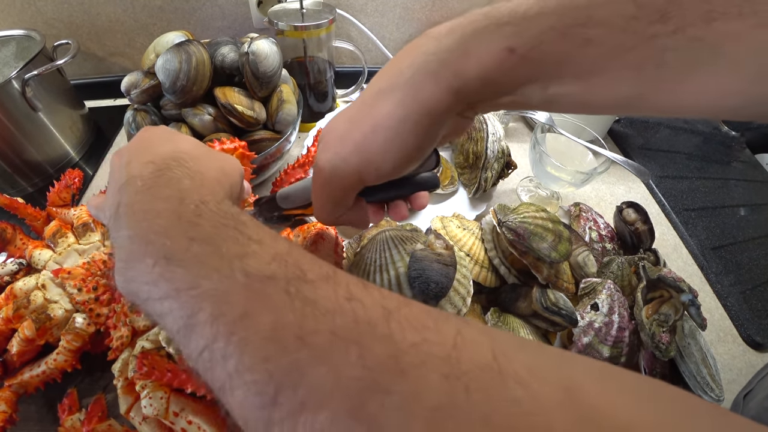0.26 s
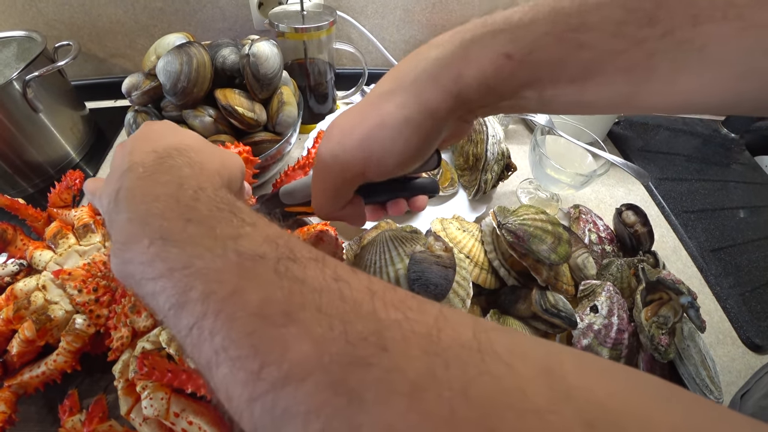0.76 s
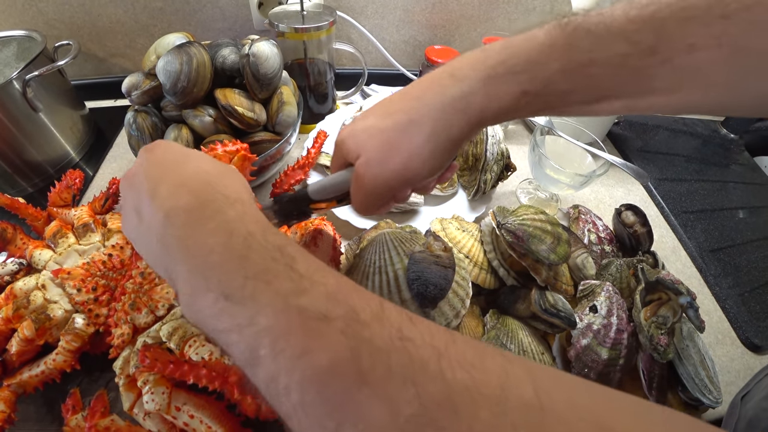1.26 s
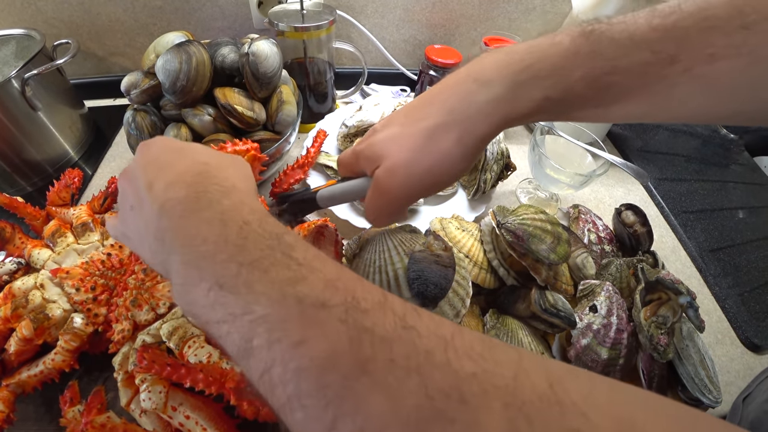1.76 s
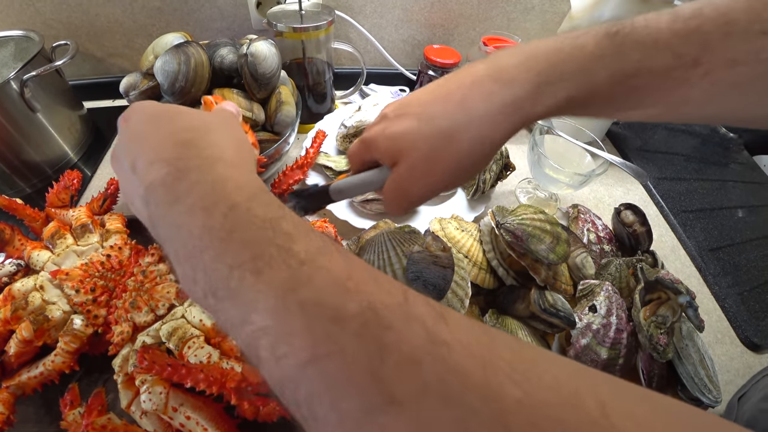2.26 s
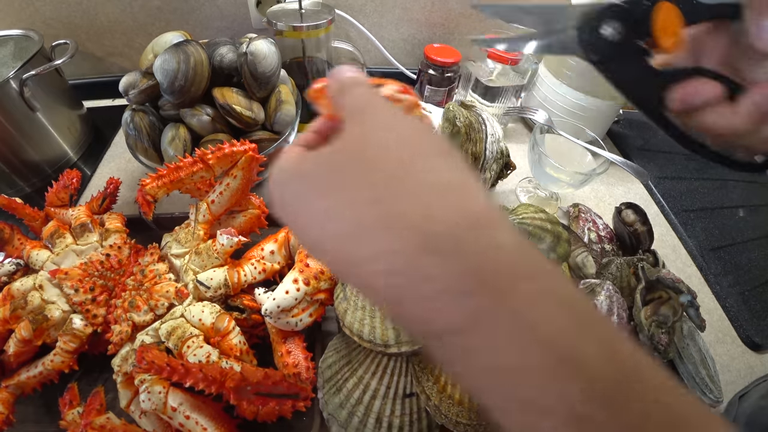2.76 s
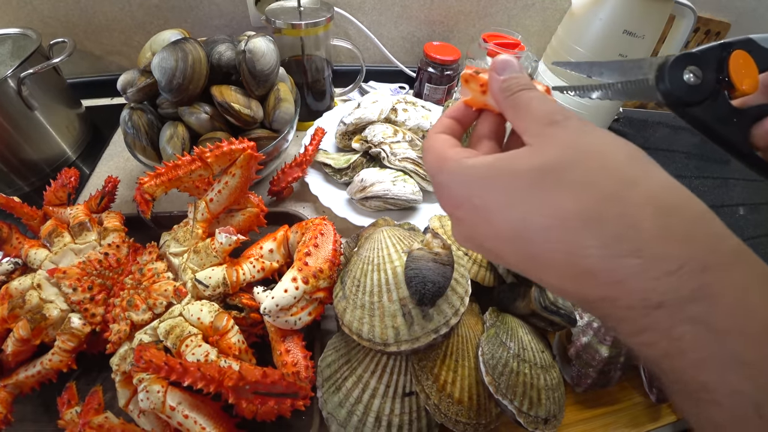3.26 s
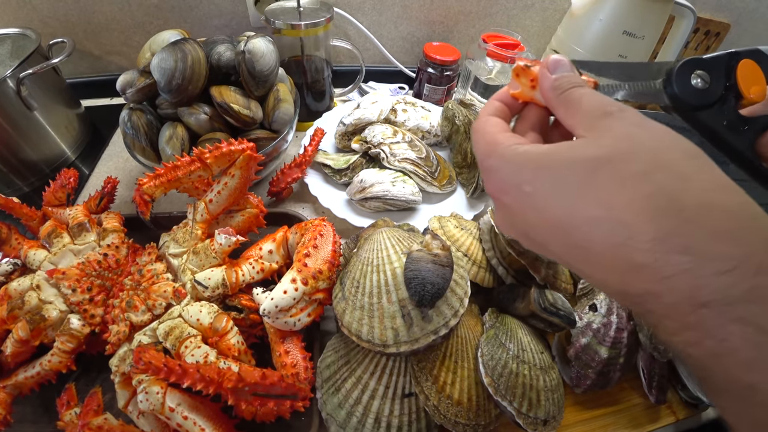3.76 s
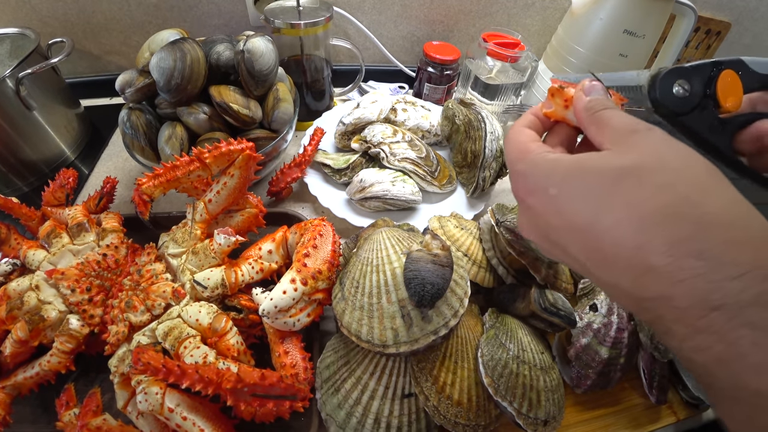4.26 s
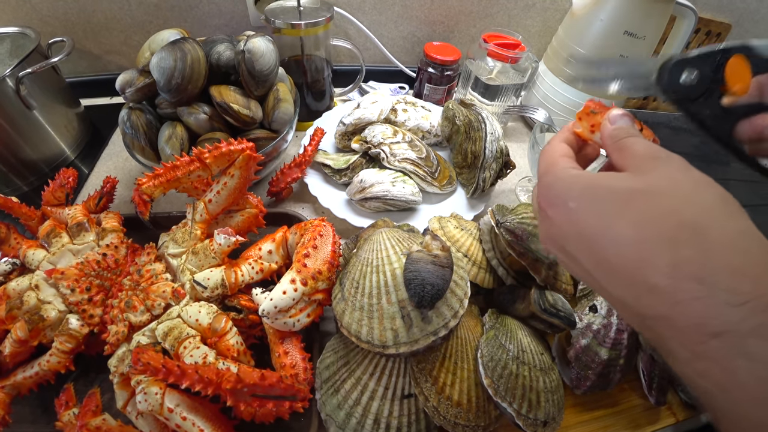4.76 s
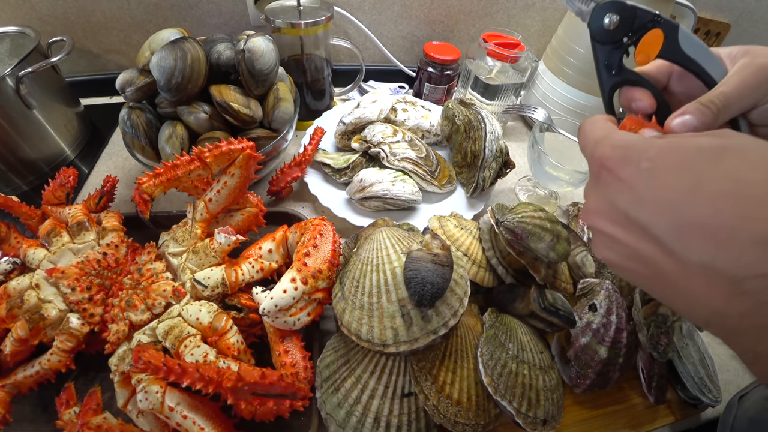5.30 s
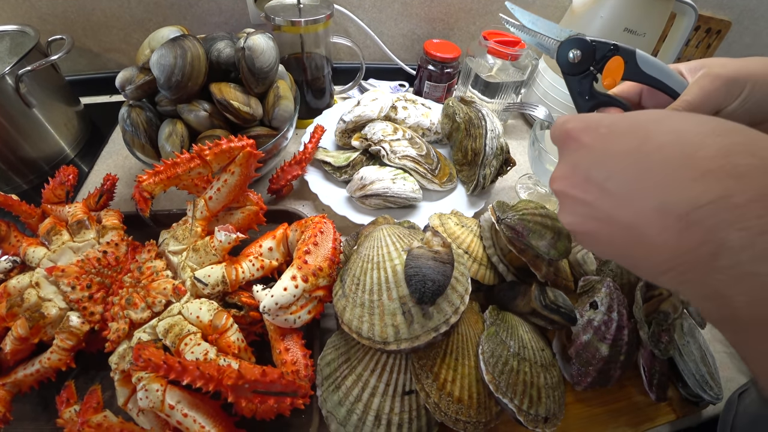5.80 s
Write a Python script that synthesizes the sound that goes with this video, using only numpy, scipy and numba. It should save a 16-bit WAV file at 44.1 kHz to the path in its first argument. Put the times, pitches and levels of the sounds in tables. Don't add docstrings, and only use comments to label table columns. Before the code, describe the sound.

Shears crunch through hard crab shell on a kitchen table, then snip a lifted piece with sharp cracks, over a quiet fridge drone.

```python
import sys
import numpy as np
from scipy import signal
from scipy.fft import rfft, irfft
from scipy.io import wavfile
from numba import njit

SR = 44100
rng = np.random.default_rng(int(sys.argv[2]) if len(sys.argv) > 2 else 0)


def inscribe(sig):
    pcm = np.round(np.clip(np.atleast_2d(sig).T, -1, 1) * 32767)
    wavfile.write(sys.argv[1], SR, pcm.astype(np.int16))


def voltage_ratio(decibels):
    exponent = np.asarray(decibels, float) / 20
    return 10 ** exponent


N = 266099

# start in seconds, level in dB, crispness in dB, burst length in ms.
HANDLING = [(.0818, -30.5, -5, 1.7), (.094, -27, 7.5, 7), (.1154, -27, -3, 17), (.1441, -31.5, 10.5, 1.4),
            (.1588, -20.5, -3, 3.1), (.1756, -46, 10, 5.4), (.2402, -32, -0.5, 10.7),
            (.4084, -29.5, 10.5, 4.9), (.4194, -32.5, 7.5, 13), (.5182, -52, 21, 6.7),
            (.6426, -27.5, -32, 3.7), (1.2395, -33, 2, 7.1), (1.2967, -30, 8.5, 6.7),
            (1.3787, -41.5, 20, 23), (1.4815, -28, 10, 6.9), (1.5639, -28, 4.5, 4.5),
            (1.6283, -33.5, -20, 6.4), (1.7775, -38, 9.5, 10), (5.1751, -47.5, 9, 2.17),
            (5.196, -50, -1, 1.5)]
# start in seconds, level in dB, depth of the break in dB,
# burst length in ms.
CRUNCH = [(.8348, -33.5, -10.5, 7.8), (.8394, -19.5, 4, 3.3), (.8463, -15.5, -5, 5),
          (.8557, -13.5, 1.5, 3.2), (.8763, -18, 0.5, 1.5), (.8862, -17, -2, 3.6), (.9076, -10, -11, 4),
          (.9333, -26.5, -8, 14), (.955, -12.5, -7, 6.2), (.981, -22, 3, 2.9), (.9836, -8, 2, 2.91),
          (1.0124, -10, 16, 5.1), (1.0207, -15, 16.5, 16), (1.0504, -19, 15, 17), (1.0741, -14.5, 6.5, 5),
          (1.08, -17, 14.5, 7.9), (1.1215, -25, 15.5, 2.2), (1.129, -19, -1, 11), (1.1409, -21, -6, 4.5),
          (1.1845, -18, 3.5, 3.8), (1.2638, -15, 5, 5.8), (1.3429, -40.5, -3, 4), (1.9694, -27, 5.5, 6.9),
          (1.9821, -26.5, 10.5, 12.3), (2.0196, -28.5, 8, 5.5), (2.0324, -33, 13, 5.1),
          (2.0534, -13.5, 10, 6.8), (2.0854, -15.5, 5.5, 6.8), (2.1077, -16, 8.5, 6.7),
          (2.2867, -38.5, 12.5, 20)]
# start in seconds, level in dB, crispness in dB,
# burst length in ms.
TAPS = [(1.4219, -33, 6.5, 6), (1.4659, -32.5, 0, 3.3), (1.5834, -27, 0.5, 2.6), (1.6964, -45, 0, 2.6),
        (1.7062, -31, -2, 4.7), (1.823, -34, -4, 5.2), (1.8471, -35, -3, 31), (1.906, -27, -0.5, 13),
        (2.297, -33.5, -19, 12.6), (2.8788, -62.5, 23.5, 1.2), (3.0636, -68.5, 27, 3),
        (3.3314, -49, -8, 1.6), (3.3469, -59, 15, 6), (3.5334, -48, 1, 3.8), (3.5902, -44, -3, 7.4),
        (3.6721, -45, -9, 8.5), (5.3087, -75.5, 40, 9.5), (5.362, -52, 1, 3.5), (5.4459, -66.5, 19.5, 2.8),
        (5.5037, -43, 4, 3.6), (5.5464, -50, -1, 3.8), (5.7311, -21, 1, 3.9), (5.8028, -41, 11, 2.5)]
# start in seconds, level in dB, crispness in dB, burst length in ms.
SNIPS = [(3.8567, -23.5, -1.5, 2.3), (3.9195, -26, 6.5, 8.4), (3.9288, -15.5, 2.5, 2),
         (3.9471, -13, 0.5, 2.5), (3.951, -12, 4.5, 3.2), (3.9626, -18.5, 4.5, 5.9),
         (3.9722, -21.5, -2.5, 2.5), (3.9896, -23, 1, 3.3), (4.1315, -14, 2, 2.6), (4.1693, -23.5, -5, 6.1),
         (4.2116, -32.5, 10.5, 2.2), (4.2183, -41, 13, 4), (4.2311, -17.5, 4, 4.9), (4.2423, -21, 8, 3),
         (4.2511, -6.5, -7, 1.9), (4.2605, -17.5, -26, 3), (4.2694, -13, -3, 12), (4.2875, -23.5, 7.5, 1.9),
         (4.306, -27, -18, 10), (4.3255, -43.5, 20.5, 4.7), (4.5015, -18, 7.5, 1.9),
         (4.533, -23.5, 9.5, 1.5), (4.5368, -21, 10.5, 2.1), (4.5432, -15.5, 5, 2.5),
         (4.5532, -29, 5.5, 18), (3.9312, -13, -1, 4), (3.9435, -21, 2.5, 3.4), (3.9556, -9, -4.5, 4.8),
         (3.9752, -18.5, 3.5, 8.9)]
# start in seconds, level in dB, crispness in dB,
# burst length in ms.
SPLITS = [(4.576, -26.5, 12, 1.1), (4.5792, -23, 12, 3.2), (4.7193, -33, 5, 10), (4.7351, -16.5, 1.5, 2.6),
          (4.7583, -25.5, -7, 1.6), (4.7703, -15.5, -5, 2.3), (4.7859, -21.5, -7, 1.7),
          (4.7903, -15, -9.5, 5), (4.8017, -6.5, -19, 2.5), (4.8072, -10.5, -2.5, 5.6),
          (4.8173, -19, -1.5, 2.7)]
# the events,
# four shares in dB, four changes in dB per dB of the events' third column.
KINDS = [
    (HANDLING, (-9.5, -19.5, -15, -1.5), (0.83, 0.91, 0.4, 0)),
    (CRUNCH, (0.5, -10, -1.5, -15.5), (-0.031, 0.26, -.4, 1.04)),
    (TAPS, (-7.5, -1, -11, -10.5), (0.8, 0.061, 1.05, 0.41)),
    (SNIPS, (-2.5, -2.5, -3, -29), (1.09, 0.086, 1.17, 0.74)),
    (SPLITS, (1, 1, -23.5, -4.5), (0.95, 0.18, 2.4, 0.48)),
]


def fractures():
    breaks = []
    for events, shares, slopes in KINDS:
        for s, db, trait, ms in events:
            parts_db = db + np.array(shares) + trait * np.array(slopes)
            breaks.append((s, *parts_db, ms))
    return breaks


# time in seconds, pitch in
# Hz.
FRAGMENTS = [(0.082, 5610.0), (0.094, 5200), (0.145, 3690.0), (0.16, 4640.0), (0.409, 4000),
             (0.643, 3620.0), (0.84, 6040), (0.847, 4000), (0.856, 4000), (0.877, 8350.0),
             (0.887, 4050), (0.908, 5300), (0.935, 8470.0), (0.957, 8100), (0.985, 5060),
             (1.013, 3860), (1.023, 4270), (1.052, 6790.0), (1.074, 7200), (1.081, 4030),
             (1.122, 4010), (1.133, 7140), (1.141, 9740.0), (1.185, 7540), (1.265, 4770),
             (1.298, 4230.0), (1.424, 10210.0), (1.483, 4500), (1.584, 4600), (1.708, 3880),
             (1.788, 4360), (1.971, 4030), (2.054, 8200), (2.086, 5050), (2.11, 5400), (2.287, 5660),
             (3.857, 6740.0), (3.921, 5310.0), (3.929, 5030), (3.947, 5080), (3.951, 4360),
                    (3.963, 5090), (3.991, 6420.0), (4.132, 8100), (4.17, 6690.0), (4.212, 5440.0),
                    (4.219, 10250.0), (4.231, 5700), (4.244, 5900), (4.251, 3820), (4.261, 3900.0),
                    (4.27, 10270), (4.288, 6700), (4.326, 5950), (4.502, 4310), (4.537, 5830),
                    (4.543, 5740), (4.556, 5330.0), (4.58, 6400), (4.72, 5720), (4.735, 5670),
                    (4.759, 5800), (4.771, 5700), (4.787, 6320.0), (4.791, 5600), (4.802, 5840),
                    (4.808, 5680), (4.818, 6360), (5.732, 5700), (5.804, 4180)]


def fragment_hz(s, usual_hz):
    at, hz = min(FRAGMENTS, key=lambda row: abs(row[0] - s))
    return hz if abs(at - s) < .006 else usual_hz


# frequency in Hz, width in Hz, level in dB.
LEG = [(803, 71, -4.5), (1226, 130, -7.5), (1668, 420, -3), (2025, 170, -0.5)]


def cracks(hz, loose):
    drive, t = np.zeros((4, N + 2048)), np.arange(2048) / SR
    for s, *db, ms in fractures():
        spray = rng.standard_normal((4, 2048)) * voltage_ratio(3.2 * rng.standard_normal(2048))
        first_break = .8 * np.exp(-t / .0006)
        tear = .75 * np.exp(-t * 1000 / ms)
        crumbs = .06 * np.exp(-t / .011)
        burst = spray * (first_break + tear + crumbs)
        burst *= 1 - np.exp(-t * 90000 / ms ** 2)
        burst[:, 0] += 3.2 + 10. / ms
        b, a = signal.iirpeak(fragment_hz(s, 3600 * 2.32 ** rng.random()), 4.0, SR)
        burst[0] = .62 * burst[0] + 1.6 * signal.lfilter(b, a, burst[0])
        i = int(s * SR)
        drive[:, i:i + 2048] += voltage_ratio(np.array(db))[:, None] * burst
    snap, ring, splinter, body = drive[:, :N]
    sharp = voltage_ratio(-2.5) * band(snap, 2700, 8200) + voltage_ratio(-1.0) * band(splinter, 5800, 12460)
    leg = voltage_ratio(-0.5) * band(body, 600, 2490, order=3) + voltage_ratio(5.0) * modes(body, LEG)
    return sharp + voltage_ratio(12.0) * shell(ring, hz, loose) + leg


# time in seconds, ring pitch in Hz, left minus right in dB,
# looseness of the grip as a factor on the ring width.
PIECE = [(0, 2242, 0, 1.2), (.8, 2580, 1, 1.8), (1.2, 2710, 0.5, 1.5), (1.35, 2910, 1.5, .45),
         (1.95, 2857, 2.5, 0.7), (2.27, 2860, 0.5, .8), (2.285, 2026, -2, .8), (3.3, 2543, -1, 1.5),
         (3.6, 2670, -2, 0.7), (4.2, 2646, -3.5, 0.78), (4.29, 2960, -2.5, 1.5), (4.4, 2810, -2.5, 1.8),
         (4.56, 2830, -4.5, 1.2), (4.62, 3066, -2, 4), (4.815, 2946, -5.5, 0.97), (4.84, 3150, 2, 2.2),
         (5.1, 3080, -4, 1.9), (5.73, 2707, -4, 2.1), (6.03, 2920, 0, .9)]


def held_piece():
    s, *columns = np.transpose(PIECE)
    hz, pan_db, loose = [np.interp(np.arange(N) / SR, s, column) for column in columns]
    return hz, pan_db, np.clip(loose, .25, 3)


# offset as a share of the ring pitch, width in Hz, level in dB.
SHELL = [
    (-.03, 240, 0),
    (.035, 220, -1),
    (.02, 900, -13),
]


def shell(x, hz, loose):
    wobble, wobble_per_s = 0.021, 90
    t = np.arange(N) / SR
    flutter = np.interp(t * wobble_per_s, np.arange(2000), rng.standard_normal(2000))
    hz = hz * (1 + wobble * loose * flutter)
    parts = [(1 + off * loose, width * loose, db) for off, width, db in SHELL]
    parts.append((5760 / hz, 290 * loose, -13.5))
    ring = 0
    for ratio, width, db in parts:
        once = svf(x, ratio * hz, width)
        ring = ring + voltage_ratio(db) * svf(once, ratio * hz, 2 * width)
    return ring / np.sqrt(loose)


# start in
# seconds, level in dB, pitch in Hz.
CHIPS = [(0.853, -25.5, 4600), (0.868, -27.5, 3970), (0.872, -25, 3760), (0.889, -20.5, 8460.0),
         (0.8974, -27, 7050.0), (0.911, -6.5, 10400), (0.918, -21.5, 10560.0), (0.9242, -24, 7480.0),
         (0.93, -30, 7340.0), (0.9352, -24.5, 8450.0), (0.9399, -26.5, 6100.0), (0.9488, -23, 9210.0),
         (0.9561, -12, 3430), (0.9848, -16.5, 4980.0), (0.9907, -19.5, 4820), (0.9936, -10, 6090),
         (1.0016, -20.5, 2580.0), (1.0071, -18, 8430), (1.0194, -16.5, 1930), (1.0197, -24.5, 2554),
         (1.0345, -14, 3600), (1.0405, -22, 2590.0), (1.0527, -19.5, 6820.0), (1.072, -14.5, 6860.0),
         (1.0932, -32, 2420), (1.1258, -33, 2760), (1.1333, -21, 7000), (1.275, -34, 4550),
         (1.297, -23.5, 2800), (1.4243, -26, 2830), (1.484, -27, 1970), (1.487, -31, 1800),
         (1.5927, -30, 2900), (1.9706, -33, 4100), (1.9789, -24.5, 2230.0), (2.0148, -30, 3910.0),
         (2.0656, -10, 9800), (2.0742, -20, 1800), (2.083, -19, 2230), (2.0987, -19, 5330.0),
         (2.1029, -16.5, 4000), (2.1065, -25, 5340), (2.2885, -26, 5620.0),
         (3.8563, -26, 2970), (3.9696, -18, 2700), (3.9472, -8.5, 5150), (3.9625, -9, 6890.0),
                (4.133, -26, 8220), (4.1383, -29.5, 2600), (4.2184, -15.5, 10340), (4.2272, -22, 2900),
                (4.2297, -29, 2900), (4.2441, -19.5, 5920), (4.247, -23.5, 2880), (4.2588, -26, 2860),
                (4.2655, -33, 2960.0), (4.27, -14, 9950), (4.2765, -28, 3080), (4.2953, -20, 2790),
                (4.359, -28, 2770), (4.507, -28.5, 3080), (4.5123, -31, 3250.0), (4.5392, -22, 5560),
                (4.5713, -19.5, 2730), (4.5897, -16.5, 3630), (4.7359, -6.5, 5730), (4.767, -22.5, 2840),
                (4.777, -26.5, 2730.0), (4.7873, -14, 2910), (4.811, -19, 3270), (4.823, -33, 3050),
         (.080, -32.5, 796), (.095, -29, 1080), (0.115, -33, 900), (.160, -19, 1220), (0.162, -25.5, 1850),
          (0.237, -32.5, 996), (.248, -32, 1040), (.419, -31.5, 1036), (1.0124, -9, 2460),
          (1.083, -21, 1650), (1.752, -46, 1710), (3.168, -52, 1994), (5.194, -46.5, 958),
          (5.245, -49, 3300), (5.446, -42, 4450), (5.7331, -18, 2690), (5.7312, -21.5, 2390),
          (5.7313, -32, 3100), (5.8025, -25, 2720), (4.226, -26, 7000), (3.9293, -15.5, 5150),
          (4.5796, -10, 6470)]


def chips():
    out, t = np.zeros(N + 512), np.arange(512) / SR
    for s, db, hz in CHIPS:
        ping = np.sin(2 * np.pi * hz * t) * np.exp(-t * hz / 6.9)
        ping[1:3] += .7 * np.array([1, -1])
        i = int(s * SR)
        out[i:i + 512] += voltage_ratio(db - 3.5) * ping
    return out[:N]


# start in seconds, level in dB, hold in seconds, body share in dB.
SQUEEZES = [(0.073, -64, 0.054, 23), (0.157, -57, 0.022, 22.5), (0.442, -60.5, 0.1, 8.5),
            (0.594, -65.5, 0.12, 15), (0.87, -31.5, 0.12, -11), (0.994, -22.5, 0.032, -13),
            (1.097, -46.5, 0.1, 10.5), (1.247, -57.5, 0.18, 10.5), (1.47, -58, .13, 10.5),
            (1.753, -61.5, 0.12, 15.5), (2.059, -30.5, 0.028, -6), (2.266, -63, 0.041, 14)]
# start in seconds, level in dB, hold in seconds, body share in dB.
BITES = [
    (3.64, -82.5, 0.45, 28.5),
    (3.95, -36.5, 0.025, -18),
    (4.08, -50, 0.042, -23),
    (4.25, -29, 0.032, -19),
    (4.36, -52, 0.12, 2),
    (4.554, -29, 0.03, -9),
    (4.789, -31, 0.0077, -11.5),
    (5.77, -60, 0.029, 8),
]


def pressure():
    build_db_per_s, fall_db_per_s = 598.5, (390, 212.5, 198)
    settle_db, settle_db_per_s = -17.5, 77.5
    t, power = np.arange(0, N + 64, 64) / SR, 0
    for table, ring_db in ((SQUEEZES, -14), (BITES, -1)):
        for s, db, hold, body_db in table:
            after = np.maximum(t - s - hold, 0)
            fall = np.maximum(-np.outer(fall_db_per_s, after), settle_db - settle_db_per_s * after)
            build = build_db_per_s * np.maximum(s - t, 0)
            shares = np.array([[0], [ring_db], [body_db]])
            power = power + voltage_ratio(db + shares + fall - build) ** 2
    return [np.interp(np.arange(N) / SR, t, np.sqrt(p)) for p in power]


# start in seconds, end in seconds, shell ring in dB, steel in dB.
SLIDES = [
    (1.303, 1.969, -62, -69),
    (3.348, 3.355, -53, -59.5),
    (3.579, 3.598, -53, -63.5),
    (3.67, 3.817, -42.5, -49.5),
    (3.835, 3.884, -44, -50.5),
    (4.402, 4.468, -39, -48),
]
# frequency in Hz, width in Hz, level in dB.
BLADE = [(4140, 650, 9.5), (5050, 550, 3.5), (7050, 880, 11.5), (7500, 9000, -5.5), (10050, 640, 2),
         (11870, 1200, -4), (13700, 900, -3.5)]
# frequency in Hz, width in Hz, level in dB.
RUB_MODES = [(900, 120, 0), (2600, 200, -1), (3250, 150, 0), (4300, 250, -3)]


def grind(hz, loose):
    steel, ring, body = pressure()
    slide_ring = sum(gate(start, end, db) for start, end, db, _ in SLIDES)
    slide_steel = sum(gate(start, end, db) for start, end, _, db in SLIDES)
    crush = steel * level(band(grit(6000, 2.3), 2000, 13000), -3.0)
    scrape = slide_steel * level(modes(grit(11000, 1.4), BLADE), 0)
    hollow = np.hypot(ring, slide_ring) * level(shell(grit(2100, 3.5), hz, loose), -1.2)
    thumb = gate(5.5, 5.72, -61) * level(modes(grit(4000, 2.7), RUB_MODES), 0)
    leg = body * level(band(grit(2000, 3.4), 300, 3800), -8.0)
    return crush + scrape + hollow + thumb + leg


def grit(density, scatter_db):
    size = voltage_ratio(scatter_db * np.minimum(rng.exponential(size=N), 4)) * rng.standard_normal(N)
    breaks = size * (rng.random(N) < density / SR)
    return level(breaks + 0.64 * rng.standard_normal(N), 0)


# start in seconds,
# level in dB, pitch in Hz, ring time in seconds.
KNOCKS = [(0.077, -37, 128, 0.16), (0.119, -41, 252, 0.14), (0.145, -30.5, 650, 0.076),
          (0.154, -21, 147, 0.081), (0.179, -25, 188, 0.059), (0.239, -45, 182, 0.17),
          (0.299, -42, 182, 0.092), (0.644, -46.5, 156, 0.45), (1.011, -41, 700, 0.065),
          (1.049, -25, 169, 0.078), (1.079, -31.5, 136, 0.21), (1.129, -31, 556, 0.047),
          (1.239, -48.5, 537, 0.12), (1.564, -45, 648, 0.28), (1.599, -28, 162, 0.036),
          (1.907, -41, 487, 0.091), (2.052, -13, 223, 0.022), (2.089, -41.5, 183, 0.3),
          (4.573, -45.5, 241, 0.18), (4.7908, -17, 907, 0.011),
          (.2, -38.5, 113, 0.3), (.418, -35, 1010, 0.067), (0.714, -47, 980, 0.11),
         (1.011, -23.5, 155.6, 0.11), (1.375, -49.5, 2120, 0.31), (1.565, -33.5, 1080, 0.06),
         (2.284, -50, 6600, 0.046), (2.293, -47, 1900, 0.054), (0.069, -38.5, 1090, .05),
         (.297, -31.5, 590, 0.013), (2.981, -55, 128, 0.33), (4.7352, -22.5, 1100, 0.012),
         (5.733, -50, 6300, .1), (5.357, -59, 2920, 0.075), (4.801, -29, 230, 0.041)]


def knocks():
    out, t = np.zeros(N + 8192), np.arange(8192) / SR
    for s, db, hz, t60 in KNOCKS:
        fade = (1 - np.exp(-t * hz)) * 1000. ** (-t / t60)
        rattle = band(rng.standard_normal(8192), 0.69 * hz, hz + 250)
        tone = np.sin(2 * np.pi * hz * t)
        i = int(s * SR)
        out[i:i + 8192] += voltage_ratio(db) * fade * (0.78 * tone + 6.7 * rattle)
    return out[:N]


def bounces(bright, near):
    halves = rng.standard_normal((3, 120)) * np.exp(-np.arange(120) / 16)
    corners = np.arange(N // 900 + 2)
    turn = np.interp(np.arange(N) / 900, corners, 2 * np.pi * rng.random(len(corners)))
    facing = bright + voltage_ratio(2.5) * band(near, 7000, 18000)
    early = 0
    for k, b in enumerate(halves):
        reflected = np.convolve(facing, np.r_[-b[::-1], 0, b], "same")
        early = early + np.cos(turn + k * 2 * np.pi / 3) * reflected
    return voltage_ratio(-27) * early * np.array([[1], [-1]])


def room(bright):
    t60_s, damp, sway_samples = 0.47, 0.13, 14.
    lags = np.array([331, 547, 811, 1097, 1429, 1811, 2251, 2749])
    gain = voltage_ratio(-60 * lags / SR / t60_s)
    return voltage_ratio(-17) * walls(bright + 1e-18, lags, gain, damp, sway_samples)


@njit
def walls(x, lags, gain, damp, sway):
    line, soft, out = np.zeros((8, 4096)), np.zeros(8), np.zeros((2, len(x)))
    for i in range(len(x)):
        total = 0.
        for k in range(8):
            back = i + 4096 - lags[k] + sway * np.sin(i * (3 + k) / SR * 2 + k)
            j = int(back)
            early, later = line[k, j & 4095], line[k, (j + 1) & 4095]
            late = early + (back - j) * (later - early)
            soft[k] += (1 - damp) * (gain[k] * late - soft[k])
            total += soft[k]
            out[k % 2, i] += soft[k]
        for k in range(8):
            line[k, i & 4095] = x[i] + soft[k] - total / 4
    return out


# frequency in Hz, level in dB per Hz.
KITCHEN = [(20, 3.5), (60, 2.5), (120, 1), (250, -6), (400, -9.5), (630, -13.5), (1000, -14.5),
           (2000, -18.5), (4000, -22), (7000, -22.5), (9000, -28), (12500, -25), (16500, -26)]
# frequency in Hz, side minus mid in dB.
KITCHEN_SIDE = [(30, -20.5), (110, -13), (200, -3), (380, 4.5), (800, 10), (2000, 8.5), (4400, 2),
                (9000, -4.5)]
# frequency in Hz, width in Hz, level in dB.
FRIDGE = [(128, 4.7, -66.5), (191, 2.8, -67.5), (264.3, 4.4, -62.5), (318, 14, -68)]


def kitchen():
    hz = np.maximum(np.arange(N // 2 + 1) * SR / N, 1)
    air_hz, air_db = np.transpose(KITCHEN)
    side_hz, side_db = np.transpose(KITCHEN_SIDE)
    colour = voltage_ratio(np.interp(np.log(hz), np.log(air_hz), air_db))
    mid, side = (rfft(rng.standard_normal(N)) * colour for _ in range(2))
    side = side * voltage_ratio(np.interp(np.log(hz), np.log(side_hz), side_db))
    air = np.array([irfft(mid + side, N), irfft(mid - side, N)])
    air = air * voltage_ratio(-61.5 + 4.5) / np.std(air.mean(axis=0))
    drone = sum(level(modes(rng.standard_normal(N), [(f, width, 0)]), db) for f, width, db in FRIDGE)
    return air + drone


def level(x, db):
    return x * voltage_ratio(db) / np.sqrt(np.mean(x ** 2))


def gate(start, end, db, edge=0.0088):
    return voltage_ratio(db) * np.interp(np.arange(N) / SR, [start - edge / 2, start, end, end + 2 * edge], [0, 1, 1, 0])


def band(x, lo_hz, hi_hz, order=2):
    return signal.sosfilt(signal.butter(order, [lo_hz, hi_hz], "band", fs=SR, output="sos"), x)


def modes(x, table):
    return sum(voltage_ratio(db) * svf(x, np.full(N, 1. * f), np.full(N, 1. * width)) for f, width, db in table)


@njit
def svf(x, hz, width):
    y, b, l = np.empty(len(x)), 0., 0.
    for i in range(len(x)):
        g, k = np.tan(np.pi * hz[i] / SR), width[i] / hz[i]
        v = (b + g * (x[i] - l)) / (1 + g * (g + k))
        b, l, y[i] = 2 * v - b, l + 2 * g * v, k * v
    return y


def scene():
    hz, pan_db, loose = held_piece()
    near = cracks(hz, loose) + grind(hz, loose) + knocks() + chips()
    near = np.roll(near, int(.0006 * SR))
    bright = band(near, 350, 17950, order=1)
    early = bounces(bright, near)
    balance = voltage_ratio(np.array([pan_db, -pan_db]) / 2)
    return (near + early) * balance + room(bright) + kitchen()


def roll_off(x):
    return signal.sosfilt(signal.butter(12, 16800, fs=SR, output="sos"), x)


def record(dry):
    rounded = 1.15 * np.tanh(dry / 1.15)
    top = signal.ellip(8, .3, 38, 15830, fs=SR, output="sos")
    mix = signal.sosfilt(top, rounded)
    return roll_off(mix)


dry = scene()
out = record(dry)
inscribe(out)
```